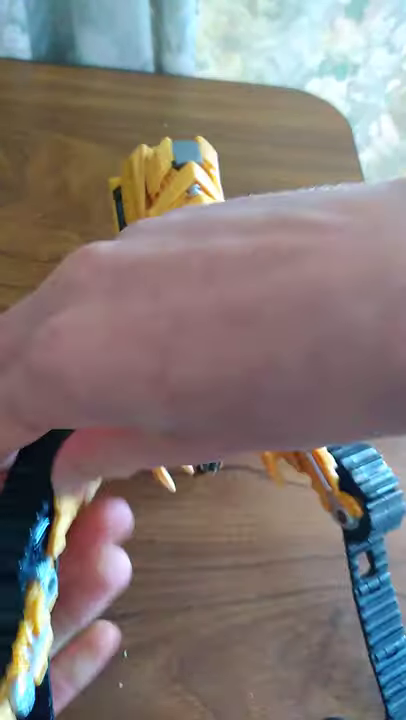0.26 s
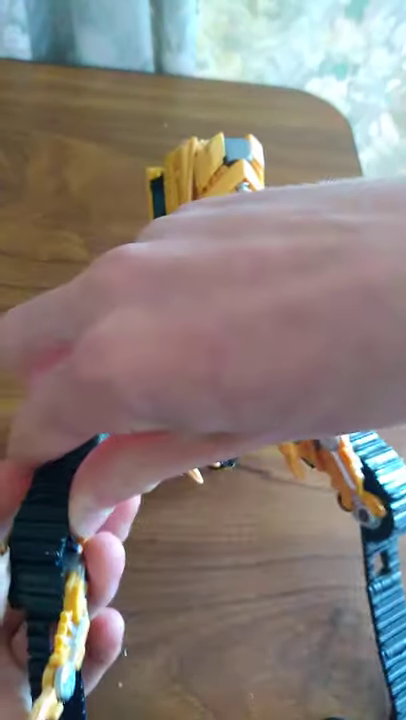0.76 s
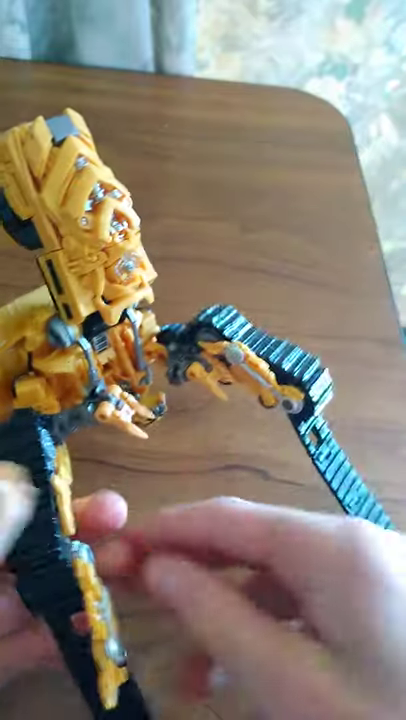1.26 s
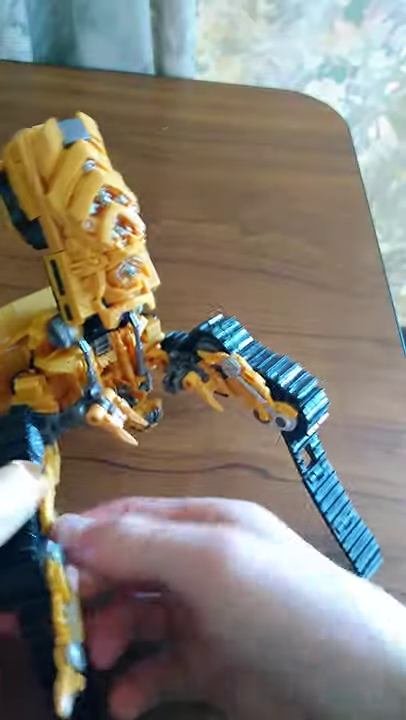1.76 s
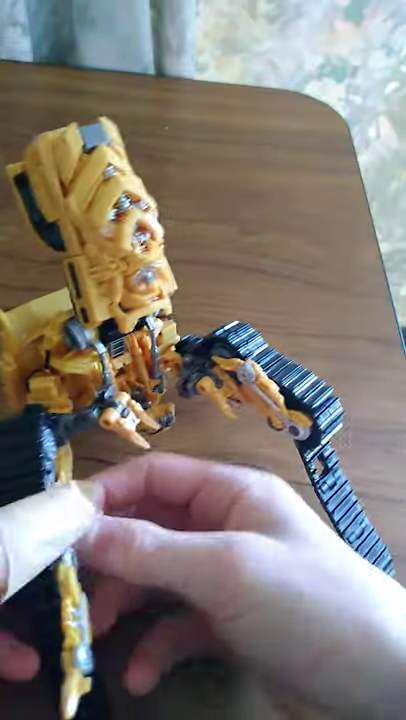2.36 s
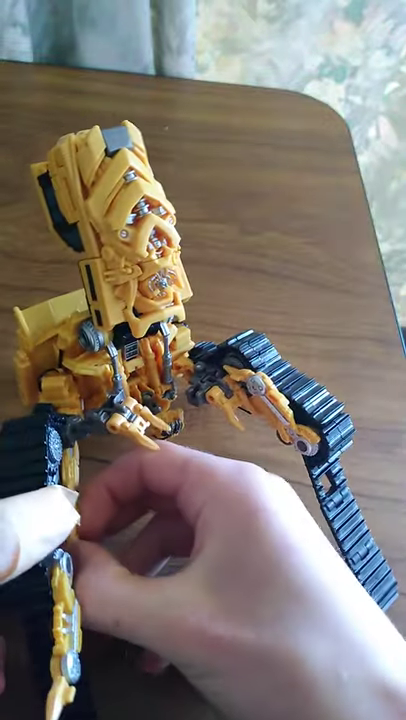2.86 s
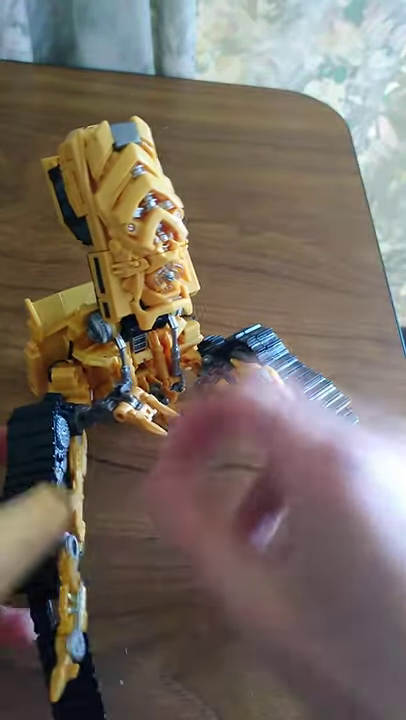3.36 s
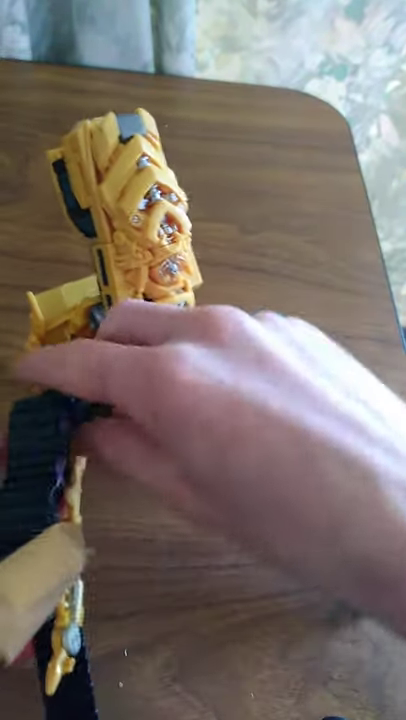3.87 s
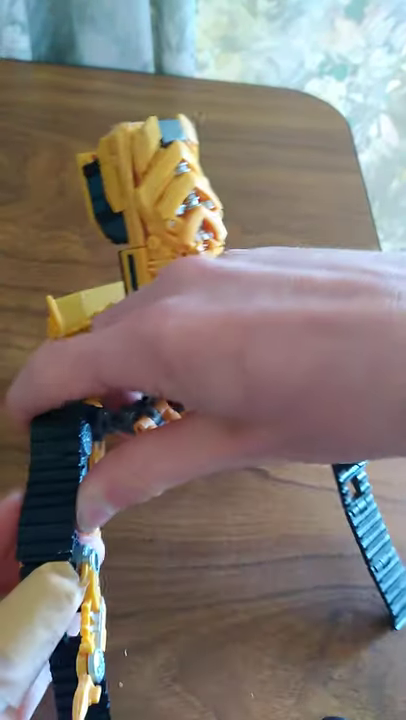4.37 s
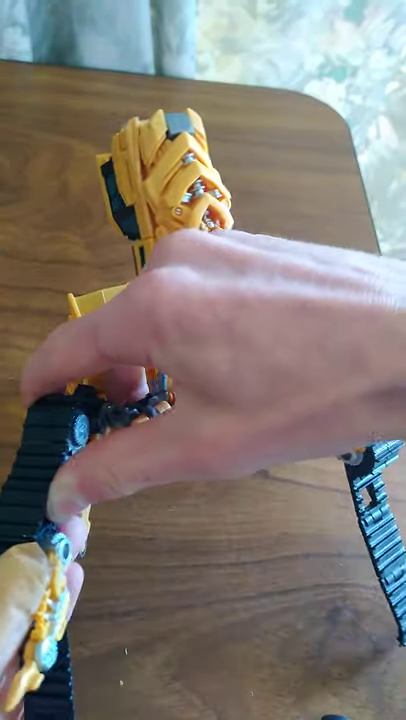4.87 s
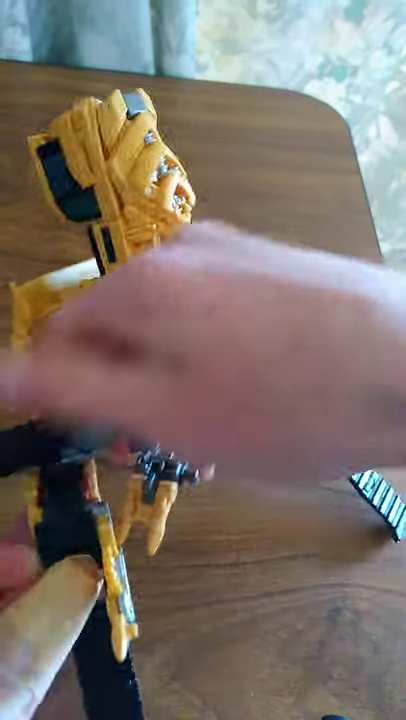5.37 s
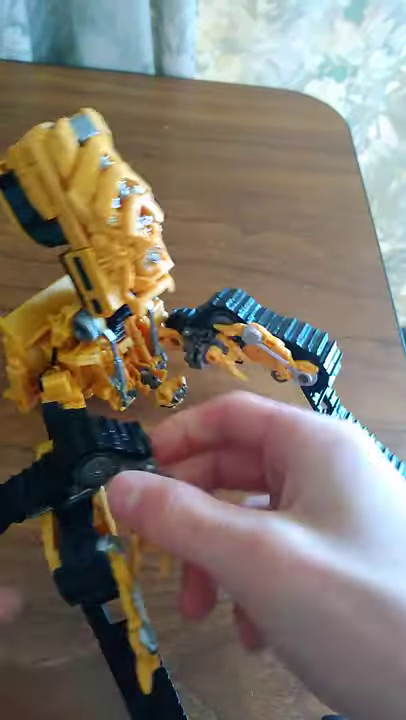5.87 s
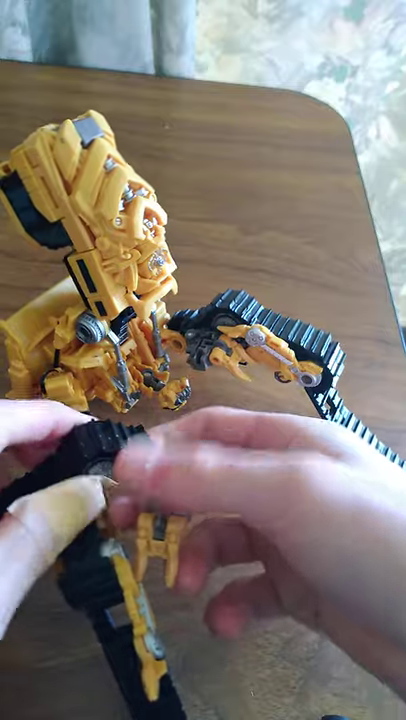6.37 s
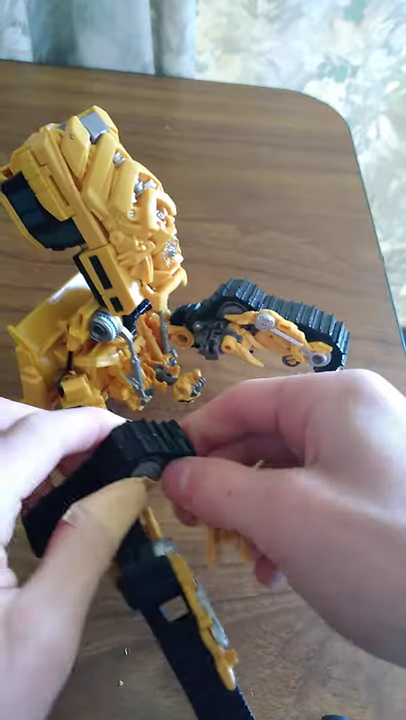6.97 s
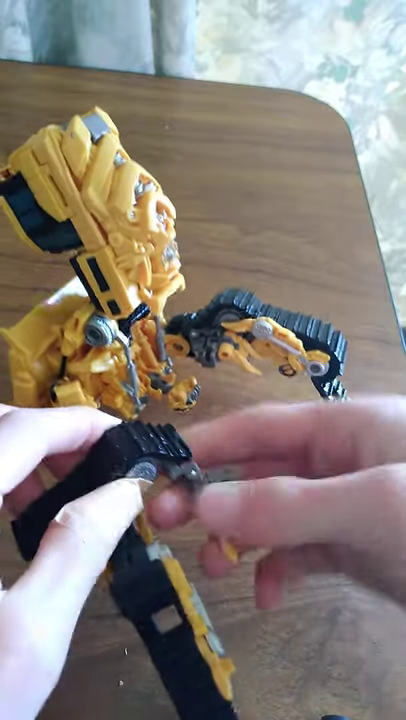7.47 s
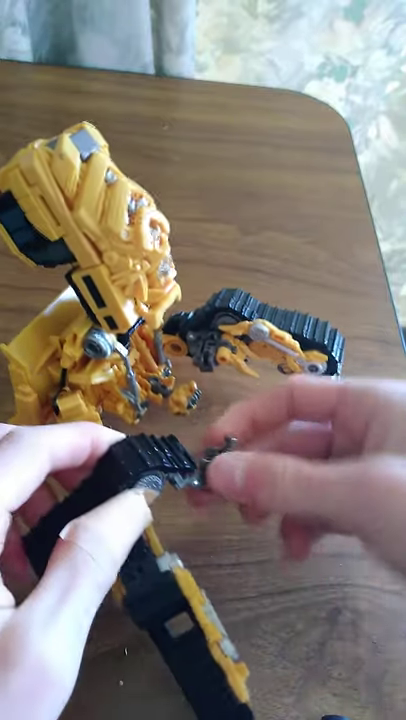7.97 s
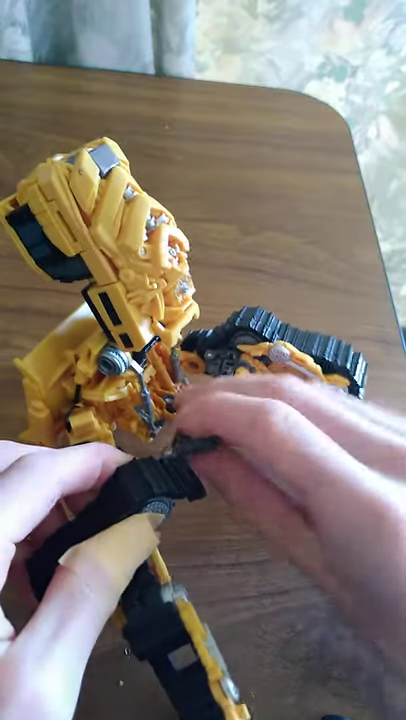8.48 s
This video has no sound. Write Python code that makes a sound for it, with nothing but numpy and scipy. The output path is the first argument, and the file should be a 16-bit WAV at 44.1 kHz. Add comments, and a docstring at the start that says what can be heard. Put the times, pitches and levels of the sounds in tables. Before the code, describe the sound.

Stiff plastic joints click and snap while fingers slide across the shell in short, airy, raspy strokes. Early handling is busy, including a scrape and two very bright ticks; the middle is mostly soft rubbing and muffled knocks. The strongest moment is a tight run of hard snaps and a table bump, followed by isolated clacks, faint hinge creaks and a double clack late on. Close microphones, small furnished room, low steady hiss.

```python
"""A plastic toy figure clicks, snaps and squeaks as two hands fold its limbs on a wooden table.
Clicks are short noise bursts and knocks are soft pushes; both ring the resonances of hollow plastic.
Rubbing, creaks, squeaks and one stiff joint's scrape are noise shaped by tiny stick-slip jerks.
Low table thuds, a small room and a faint steady hiss complete the close stereo sound."""
import sys
import numpy as np
from scipy import signal
from scipy.fft import rfft, irfft, next_fast_len
from scipy.io import wavfile

SR = 44100
rng = np.random.default_rng(int(sys.argv[2]) if len(sys.argv) > 2 else 0)


def persist_wave(psi):
    """Save psi, clipped to +-1, as 16-bit WAV."""
    counts = np.round(np.clip(psi, -1, 1) * 32767).astype(np.int16)
    wavfile.write(sys.argv[1], SR, np.atleast_2d(counts).T)


N = 384111  # samples in the scene
TAPS = 8192  # samples in the frequency grid and in the longest short sounds
HZ = np.fft.rfftfreq(TAPS, 1 / SR)
CUTOFF_HZ = 16200

# Finger or part sliding over plastic: [start t/s, length t/s, hollow level/dB, rasp level/dB, hiss level/dB]
STROKES = [(0, 0.13, -50, -49.5, -43.5), (0.151, 0.42, -67, -63.5, -48), (0.271, 0.25, -56.5, -52.5, -55),
           (0.617, 0.24, -94, -75, -76.5), (0.929, 0.2, -51.5, -49, -42.5), (1.127, 0.149, -48, -60, -51),
           (1.297, 0.106, -50, -50.5, -54.5), (1.386, 0.18, -65, -61.5, -45),
           (1.539, 0.15, -51.5, -51.5, -43.5), (1.776, 0.21, -57, -55, -50), (2.303, 0.26, -58, -67, -58),
           (2.693, 0.11, -66, -60.5, -48.5), (2.798, 0.17, -71, -72, -90),
           (3.24, 0.093, -66.5, -68.5, -49.5), (3.283, 0.5, -55, -73.5, -59.5),
           (3.507, 0.095, -57.5, -50, -51), (3.619, 0.19, -51.5, -48, -49),
           (3.821, 0.062, -51.5, -50, -43.5), (4.008, 0.23, -59, -59.5, -48.5),
           (4.13, 0.11, -79, -58, -49.5), (4.222, 0.21, -80, -61.5, -52), (4.504, 0.068, -53.5, -55.5, -49),
           (4.583, 0.18, -59, -66, -55), (5.063, 0.061, -51, -54, -61.5), (5.326, 0.45, -67.5, -72, -55),
           (5.791, 0.18, -53.5, -59.5, -50.5), (5.99, 0.44, -62.5, -63, -56), (6.11, 0.11, -55.5, -56, -45),
           (6.776, 0.17, -57.5, -63, -61.5), (6.927, 0.35, -71, -74.5, -86), (7.958, 0.1, -61, -69.5, -56),
           (8.046, 0.071, -56.5, -49.5, -44.5), (8.334, 0.22, -61, -71.5, -57),
           (8.377, 0.12, -55, -50.5, -45.5)]
# Constant faint rubbing of the holding hand: [hollow level/dB, rasp level/dB, hiss level/dB]
GRIP_LEVELS = (-88, -84, -71)
# Resonances brought out by a sliding finger: [f/Hz, width f/Hz, relative level/dB]
RUB_MODES = [(311, 26, 8), (508, 69, -4.5), (1100, 190, 0), (1505, 350, -5.5), (1990, 300, -6),
             (3190, 650, -7), (7300, 1400, -8), (9400, 810, 6), (11200, 4400, -20.5)]
# Treble shape of rubbing: [f/Hz, relative level/dB]
RUB_TREBLE = [(10000, 1.5), (12000, -4.5), (16000, -13)]
# Hollow, middle and bright registers of rubbed plastic: [from f/Hz, to f/Hz]
RUB_BANDS = [(190, 680), (900, 5200), (5500, 16500)]
# Resonance of a held part, favoured on the left: [f/Hz, width f/Hz, relative level/dB]
FACING_MODE = [(1100, 260, -6.5)]
STROKE_ATTACK_SHARE, STROKE_RELEASE_S = 0.14, 0.019  # share of the stroke's length; fade time
ARCH_DB = 7.5  # a stroke, creak or squeak is this much weaker at its ends than midway
PRESSURE_DB, PRESSURE_PER_S = 3, 63  # depth and rate of uneven finger pressure
RUB_PAN_DB = 0

# Quiet background colour: [f/Hz, relative level/dB]
BACKGROUND = [(30, 4.5), (80, 20), (180, 2), (320, -10.5), (700, -20.5), (1100, 1), (2500, -24.5),
              (5000, -29.5), (9300, -18.5), (13000, -18)]
BACKGROUND_DB = -69

# Toy bumping the table: [t/s, level/dB]
THUDS = [(.005, -47), (0.407, -44.5), (0.96, -45), (1.502, -47.5), (2.199, -42), (2.378, -45), (3.528, -49),
         (3.732, -43.5), (5.129, -39.5), (5.258, -27), (7.445, -34), (7.483, -38.5), (8.071, -45),
         (8.169, -54.5), (8.678, -53)]
# Low resonances of the table top: [f/Hz, width f/Hz, relative level/dB]
TABLE_MODES = [(68, 45, 0.5), (91, 6.1, 4), (118, 9.3, 3), (297, 39, -5), (336, 35, -5.5)]

# Joints snapping and parts clacking:
# [t/s, hollow knock level/dB, struck part f/Hz, crack level/dB, bright tick level/dB, contact t/s]
SNAPS = [(0.4026, -31, 1510, -26, -27, 0.0044), (0.8654, -34, 1060, -33, -26.5, 0.0037),
         (1.1466, -30.5, 1160, -38, -37, 0.0097), (1.382, -41, 940, -52, -42.5, 0.01),
         (1.827, -43.5, 1410, -44.5, -47, 0.0047), (2.0321, -35, 2760, -32.5, -13, 0.0031),
         (2.1969, -32.5, 1600, -26.5, -19.5, 0.0043), (2.2806, -37.5, 1280, -27, -8.5, 0.0037),
         (2.579, -44, 314, -47, -50, 0.011), (2.787, -39, 312, -45, -59, 0.0064),
         (3.586, -44.5, 1116, -45, -53.5, 0.0036), (3.743, -43.5, 1114, -41, -43, 0.0066),
         (5.114, -25, 2160, -29.5, -21.5, 0.003), (5.118, -35, 2160, -14.5, -11, 0.00097),
         (5.1229, -19.5, 1090, -25, -16, 0.0037), (5.1432, -27, 1560, -18.5, -11, 0.007),
         (5.1584, -27, 1910, -19, -13.5, 0.012), (5.231, -29.5, 1980, -30, -26, 0.0027),
         (5.2553, -17, 1330, -24, -15, 0.0018), (5.2761, -32.5, 1110, -29, -29, 0.013),
         (5.341, -34, 1920, -36.5, -28, 0.0059), (5.607, -30, 1450, -44, -46, 0.006),
         (5.63, -43.5, 520, -39, -45, 0.0033), (5.918, -32.5, 2030, -34.5, -28, 0.0017),
         (6.469, -37.5, 1180, -43.5, -44.5, 0.0049), (6.6123, -35.5, 1710, -34.5, -25, 0.00057),
         (6.7904, -32.5, 2005, -35.5, -37.5, 0.003), (7.4351, -23, 2050, -33, -21.5, 0.008),
         (7.4425, -23.5, 2050, -25, -24.5, 0.0025), (7.479, -30, 1890, -33.5, -29, 0.0051),
         (7.6046, -32, 1573, -38.5, -41.5, 0.0027), (8.087, -39.5, 1133, -50, -52, 0.012),
         (8.202, -40.5, 1400, -45.5, -46.5, 0.0078), (8.5388, -49.5, 2970, -41.5, -35, 0.0031),
         (8.612, -40, 980, -58, -57, 0.0014)]
# Small catches: [t/s, bright tick level/dB, contact t/s, left minus right level/dB before the microphones]
TICKS = [(0.016, -32.5, 0.00099, 3), (.188, -44.5, 0.0004, -9), (.234, -44, 0.0021, 13),
         (0.2845, -42, 0.0022, 13), (0.362, -30.5, 0.011, 2.5), (1.127, -34.5, 0.0022, 1),
         (2.052, -30.5, 0.0084, -7), (2.376, -37, 0.0013, 4), (2.598, -26, 0.0154, 0.5),
         (3.525, -39, 0.01, 1), (4.188, -41.5, 0.0021, 9), (4.721, -36, 0.0025, -8.5),
         (5.089, -42.5, 0.0015, 5.5), (6.301, -35, 0.0031, 1), (7.411, -44, 0.0019, 8),
         (7.462, -28, 0.00112, 0)]
# Resonances of the plastic shell: [f/Hz, width f/Hz, relative level/dB]
SHELL_MODES = [(303, 60, 1.5), (370, 440, -11.5), (526, 60, -2), (1020, 230, 0), (1600, 69, -3.5),
               (1760, 170, -6), (2142, 240, -6.5), (3226, 580, -6), (5170, 3400, -9.5), (7700, 1700, -7.5),
               (9324, 1200, 4.5), (11200, 4400, -20)]
# Treble shape of a click: [f/Hz, relative level/dB]
CLICK_TREBLE = [(10000, 4.5), (16000, 2.5)]
# Hollow, middle and bright registers of struck plastic: [from f/Hz, to f/Hz]
CLICK_BANDS = [(180, 2450), (2450, 6500), (6500, 16500)]
TICK_KNOCK_DB, TICK_CRACK_DB, TICK_PART_HZ = -26.5, -15, 1690  # both levels are against the tick
CHATTER_DB, CHATTER_S = -28.5, 0.021  # level against the contact; decay time
# Gain at the very top for each halving of contact time, counted from the plain contact
SHARP_DB, PLAIN_CONTACT_S = 1.5, 0.01

# Soft knocks on hollow parts: [t/s, level/dB, struck part f/Hz]
KNOCKS = [(0.094, -45.5, 960), (.405, -41.5, 320), (1.163, -35.5, 424), (1.216, -44.5, 380),
          (1.235, -45, 450), (1.311, -52.5, 1090), (1.341, -44.5, 890), (1.498, -48, 570),
          (2.198, -39.5, 340), (2.355, -42.5, 1190), (2.378, -41.5, 960), (2.498, -43, 340),
          (2.518, -42.5, 340), (2.939, -53, 1170), (3.398, -59.5, 350), (3.44, -54, 350),
          (4.071, -43.5, 340), (4.092, -45.5, 393), (5.774, -47, 980), (7.979, -55.5, 1140),
          (8.066, -45, 1120), (8.167, -57, 535), (8.679, -51.5, 1090)]
# Resonances that soft knocks ring: [f/Hz, width f/Hz, relative level/dB]
KNOCK_MODES = [(333.4, 8.9, 4), (555, 50, -5.5), (1023, 220, -9), (1460, 180, -9.5)]
KNOCK_TOP_HZ, KNOCK_CONTACT_S = 1550, 0.0052  # the steep treble fall; decay time of the padded push

# Dry hinge giving a little: [start t/s, length t/s, level/dB]
CREAKS = [(0.706, 0.011, -55), (1.087, 0.0086, -39.5), (5.495, 0.074, -54.5), (5.728, 0.07, -52),
          (6.82, 0.075, -52.5), (6.884, 0.028, -42.5), (6.424, 0.045, -60), (6.665, 0.056, -52),
          (7.057, 0.022, -58.5), (7.158, 0.028, -54.5), (7.203, 0.037, -45), (7.356, 0.04, -47),
          (7.404, 0.023, -50), (8.407, 0.097, -48)]
# Resonances of the hinge: [f/Hz, width f/Hz, relative level/dB]
HINGE_MODES = [(990, 80, 8.5), (1600, 82, 4.5), (1990, 270, 2.5), (3160, 450, -8.5), (4130, 360, -20.5)]
CREAK_ATTACK_S, CREAK_RELEASE_S = 0.0067, 0.0049

# Resonances of the stiff joint: [f/Hz, width f/Hz, relative level/dB]
JOINT_MODES = [(333, 41, -3.5), (1108, 130, 4.5), (1520, 230, -0.5), (1740, 250, -10.5),
               (3880, 7100, -15.5), (9630, 720, -5)]
SCRAPE_START_S, SCRAPE_LENGTH_S, SCRAPE_DB = 0.8365, 0.16, -25
SCRAPE_ATTACK_S, SCRAPE_ARCH_DB, SCRAPE_RELEASE_S = 0.057, 10.5, 0.003

# Tight parts squeaking together: [start t/s, length t/s, level/dB, f/Hz]
SQUEAKS = [(1.368, 0.038, -44, 3250), (1.573, 0.029, -44.5, 3180), (4.347, 0.037, -57.5, 1990)]
SQUEAK_WIDTH_HZ, SQUEAK_OVERTONE, SQUEAK_OVERTONE_DB = 160, 1.55, -11.5  # overtone as a frequency ratio

# Time for room sound to fall by 60 dB: [f/Hz, t/s]
ROOM_T60 = [(300, 0.37), (1000, 0.21), (3000, 0.28), (12000, 0.24)]
# Room sound against direct sound: [f/Hz, level/dB]
ROOM_LEVEL = [(250, -3), (1000, -6), (3000, -7.5), (9000, -8)]
# Likeness of the two microphones: [f/Hz, likeness 0-1]
LIKENESS = [(120, .96), (400, .85), (800, .45), (1500, .1)]
# Left microphone minus right: [f/Hz, level/dB]
BALANCE = [(150, 0), (300, 2), (600, -1), (1100, 5), (2000, 1.5), (4000, -.5), (9000, .5)]
GRIP_SHIFT = 0.1  # largest share by which a change of grip retunes low resonances


def amp(db):
    """Turns decibels into gain."""
    return 10 ** (np.asarray(db) / 20)


def unit(x):
    """Scales to an average strength (rms) of 1."""
    return x / np.sqrt(np.mean(x ** 2) + 1e-20)


def read(points, hz):
    """Reads between table points on a log-frequency axis."""
    f, value = np.transpose(points)
    return np.interp(np.log(hz + 1), np.log(f + 1), value)


def add(mix, s, sound):
    """Mixes a sound in at time s, cutting it off at the end of the scene."""
    part = mix[:, max(round(s * SR), 0):][:, :sound.shape[1]]
    part += sound[:, :part.shape[1]]


def pan(db):
    """Left and right gains whose difference is db."""
    return amp(np.array([[db], [-db]]) / 2)


def causal(gain):
    """Builds an impulse response with this gain that rings only after the blow (minimum phase)."""
    mirrored = np.r_[gain, gain[-2:0:-1]]
    log_gain = np.log(np.maximum(mirrored, 1e-5))
    spectrum = np.exp(np.conj(signal.hilbert(log_gain)))
    return np.fft.ifft(spectrum).real[:TAPS // 2]


def ring(x, response):
    """Lets each channel ring through an impulse response."""
    convolve = signal.oaconvolve if x.shape[1] > SR else signal.fftconvolve
    return convolve(x, np.atleast_2d(response), axes=1)[:, :x.shape[1]]


def body(modes, skirt=1.04):
    """Adds the power of resonances; a larger skirt makes their sides fall faster."""
    power = 0
    for f, width, db in modes:
        detune = (HZ ** 2 - f * f) / (HZ * width + 1)
        power = power + amp(db) ** 2 / (1 + detune ** 2) ** skirt
    return np.sqrt(power)


def registers(modes, treble, bands, skirt=1.5):
    """Splits the plastic's resonances into hollow, middle and bright registers."""
    gain = body(modes, skirt) * amp(read(treble, HZ))
    return [gain / np.sqrt((1 + (lo / (HZ + 1)) ** 12) * (1 + (HZ / hi) ** 16)) for lo, hi in bands]


def spot(depth_db):
    """Each point of contact favours its own chance set of small resonances."""
    ripple = np.convolve(rng.standard_normal(len(HZ)), np.hanning(40), "same")
    return amp(depth_db * unit(ripple))


def regrip(gain, amount):
    """A tighter or looser grip (amount -1 to 1) moves the low resonances up or down."""
    shift = GRIP_SHIFT * amount / (1 + (HZ / 4000) ** 2)
    return np.interp(HZ * (1 - shift), HZ, gain)


def wander(drive, gain, spot_db=6.5, count=3):
    """Contact slides through a cycle of spots, about ten a second, so the colour keeps changing."""
    speed = np.repeat(rng.uniform(.5, 1.5, N // TAPS + 1), TAPS)[:drive.shape[1]]
    place = np.cumsum(speed) * 10 / SR
    out = np.zeros(drive.shape)
    for k in range(count):
        share = np.sin(np.pi / 2 * np.minimum((place - k) % count, 2))
        grip = 2 * k / (count - 1) - 1
        out += share * unit(ring(drive, causal(regrip(gain, grip) * spot(spot_db))))
    return out


def slips(per_s, spread_db, smooth):
    """Tiny stick-slip jerks of uneven size swell noise above a smooth friction hiss."""
    happens = rng.random(N) < per_s / SR
    sizes = amp(spread_db * np.minimum(rng.exponential(1, N), 3)) * happens
    # The power of each jerk dies away over 6.5 ms
    power = signal.lfilter([1], [1, -np.exp(-1 / (0.0065 * SR))], sizes ** 2)
    strength = np.sqrt(power / power.mean() + smooth ** 2)
    return unit(strength * rng.standard_normal((2, N)))


def push(start, length, attack_s, arch_db, release_s):
    """Strength of one push of the hand: it takes hold, peaks and dies away."""
    t = np.arange(0, length + 8 * release_s, 1 / SR)
    attack = np.sin(np.pi / 2 * np.minimum(t / attack_s, 1)) ** 2
    arch = amp(-arch_db * (2 * np.minimum(t / length, 1) - 1) ** 2)
    release = np.exp(-np.maximum(t - length, 0) / release_s)
    out = np.zeros((1, N))
    add(out, start, (attack * arch * release)[None])
    return out[0]


def blow(sound):
    """Scales each channel of a hit so that its energy, spread over 10 ms, has rms 1."""
    return sound * np.sqrt(.01 * SR) / np.linalg.norm(sound, axis=-1, keepdims=True)


def pressure():
    """Chance swells and dips in how hard a finger bears down."""
    steps = np.arange(N) * PRESSURE_PER_S / SR
    levels = np.clip(rng.standard_normal(TAPS), -2, 2)
    return unit(amp(PRESSURE_DB * np.interp(steps, np.arange(TAPS), levels)))


def rubbing():
    """Slow, coarse slips sound the hollow body; fine quick ones rasp and hiss."""
    power = amp(GRIP_LEVELS)[:, None] ** 2 * np.ones(N)
    for start, length, *levels in STROKES:
        stroke = push(start, length, STROKE_ATTACK_SHARE * length, ARCH_DB, STROKE_RELEASE_S)
        power += amp(levels)[:, None] ** 2 * stroke ** 2
    coarse, fine = slips(130, 1.5, 0.22), slips(220, 8.2, 0.78)
    drives = coarse * pressure(), fine * pressure(), fine
    gains = registers(RUB_MODES, RUB_TREBLE, RUB_BANDS, 1.154)
    layers = zip(np.sqrt(power), drives, gains)
    return pan(RUB_PAN_DB) * sum(strength * wander(drive, gain) for strength, drive, gain in layers)


def facing(x):
    """One resonance of the held part is raised on the left and lowered on the right."""
    gain = 1 + body(FACING_MODE)
    return ring(x, np.array([causal(gain), causal(1 / gain)]))


def background():
    """Faint steady room noise and hiss: random noise coloured by frequency."""
    colour = causal(amp(read(BACKGROUND, HZ)))
    return amp(BACKGROUND_DB) * unit(ring(rng.standard_normal((2, N)), colour))


def thuds():
    """The toy settles on the table top, whose low modes ring from a dying noise push."""
    out, t = np.zeros((2, N)), np.arange(TAPS) / SR
    wood = causal(body(TABLE_MODES) / (1 + (HZ / 600) ** 4) / (1 + (52 / (HZ + 1)) ** 6))
    wood *= np.cos(np.linspace(0, np.pi / 2, len(wood)))  # the hands damp the ring
    settling = np.exp(-t / .018)
    for s, db in THUDS:
        force = settling * rng.standard_normal((2, TAPS))
        sound = signal.fftconvolve(force, wood[None], axes=1)
        # The level is set over the first thirtieth of a second
        add(out, s, amp(db) * sound / sound[:, :SR // 30].std(axis=1, keepdims=True))
    return out


def contacts():
    """Lists snaps and ticks alike; ticks barely stir the lower registers of the body."""
    ticks = [(s, db + TICK_KNOCK_DB, TICK_PART_HZ, db + TICK_CRACK_DB, db, length, side_db)
             for s, db, length, side_db in TICKS]
    return [(*row, 0) for row in SNAPS] + ticks


def clicks(part_db=5, part_width_hz=340, spot_db=2.5):
    """A brief hard burst, then the chatter of loose parts, rings the struck part and the body."""
    out, t = np.zeros((2, N)), np.arange(TAPS // 2) / SR
    gains = registers(SHELL_MODES, CLICK_TREBLE, CLICK_BANDS)
    top = np.clip((HZ - 9500) / 4500, 0, 1)
    for s, knock_db, hz, crack_db, tick_db, length, side_db in contacts():
        rattle = np.repeat(rng.exponential(1, len(t) // 64), 64)
        chatter = amp(CHATTER_DB) * rattle * np.exp(-t / CHATTER_S)
        contact = np.exp(-(t / max(length, .0005)) ** 2)
        burst = (contact + chatter) * rng.standard_normal((2, len(t)))
        grip = rng.uniform(-1, 1)
        part = spot(spot_db) * (0.5 + body([(hz, part_width_hz, part_db)]))
        part *= amp(SHARP_DB * np.log2(PLAIN_CONTACT_S / length) * top)  # short contacts are sharper
        for db, gain in zip((knock_db, crack_db, tick_db), gains):
            sound = ring(burst, causal(regrip(gain, grip) * part))
            add(out, s, amp(db) * pan(side_db) * blow(sound))
    return out


def knocks(part_db=4, part_width_hz=320, spot_db=2, side_db=4):
    """A part cushioned by the fingers lands in a soft, uneven push, and the hollow modes ring on."""
    out, gain = np.zeros((2, N)), body(KNOCK_MODES) / (1 + (HZ / KNOCK_TOP_HZ) ** 10)
    age = np.arange(TAPS // 2) / SR / KNOCK_CONTACT_S
    for s, db, hz in KNOCKS:
        force = np.sqrt(age) * np.exp(-age) * rng.standard_normal((1, len(age)))
        part = spot(spot_db) * (0.5 + body([(hz, part_width_hz, part_db)]))
        sound = ring(force, causal(gain * part))
        add(out, s, amp(db) * pan(side_db) * blow(sound))
    return out


def creaks(spot_db=4):
    """Quick slips in a dry hinge ring its few resonances."""
    strength = sum(amp(db) * push(s, length, CREAK_ATTACK_S, ARCH_DB, CREAK_RELEASE_S)
                   for s, length, db in CREAKS)
    return strength * wander(slips(400, 1.4, 0.6), body(HINGE_MODES, 1.72), spot_db)


def scrape(spot_db=2):
    """A tight joint turns once, juddering round in a dense run of slips."""
    turn = push(SCRAPE_START_S, SCRAPE_LENGTH_S, SCRAPE_ATTACK_S, SCRAPE_ARCH_DB, SCRAPE_RELEASE_S)
    judder = slips(520, 2.5, .55)
    gain = body(JOINT_MODES) * amp(read(RUB_TREBLE, HZ))
    return amp(SCRAPE_DB) * turn * wander(judder, gain, spot_db)


def squeaks():
    """Plastic binds on plastic: quick slips sing in one narrow resonance and its overtone."""
    out, drive = np.zeros((2, N)), slips(450, 2.1, 0.69)
    for s, length, db, hz in SQUEAKS:
        span = slice(round(s * SR), round(s * SR) + TAPS)
        strength = push(s, length, CREAK_ATTACK_S, ARCH_DB, CREAK_RELEASE_S)[span]
        overtone = (hz * SQUEAK_OVERTONE, SQUEAK_WIDTH_HZ, SQUEAK_OVERTONE_DB)
        part = causal(body([(hz, SQUEAK_WIDTH_HZ, 0), overtone], 1.5))
        add(out, s, amp(db) * strength * unit(ring(drive[:, span], part)))
    return out


def room(first_s=0.0035):
    """Dense reflections of random sign, each frequency dying away at its own rate."""
    size = SR * 2 // 3
    taps = rng.choice([-1., 1.], (2, size)) * (rng.random((2, size)) < 5000 / SR)
    taps[:, :round(first_s * SR)] = 0
    hz, t, z = signal.stft(unit(taps), SR, nperseg=256)
    t60 = read(ROOM_T60, hz)[:, None]
    fade = amp(read(ROOM_LEVEL, hz)[:, None] - 60 * t / t60)
    z *= fade * np.sqrt(2 * np.log(1000) / (t60 * SR))  # evens out the energy of long and short fades
    return signal.istft(z, SR, nperseg=256)[1]


def microphones(x):
    """Long waves reach both microphones nearly alike, short ones differently."""
    size = next_fast_len(N + TAPS)
    hz, (a, b) = np.fft.rfftfreq(size, 1 / SR), rfft(x, size)
    same, side = np.clip(read(LIKENESS, hz), 0, 1), amp(read(BALANCE, hz) / 2)
    left = a * side
    right = (same * a + np.sqrt(1 - same ** 2) * b) / side
    even_power = np.sqrt(2 / (side ** 2 + side ** -2))
    return irfft(np.array([left, right]) * even_power, size)[:, :N]


def scene():
    """The toy, the table and their room."""
    direct = facing(rubbing() + creaks()) + thuds() + clicks() + knocks() + scrape() + squeaks()
    return microphones(direct + ring(direct, room()) + background())


def record(dry):
    """Strong peaks overload softly; then a filter removes the highest treble."""
    limited = dry / (1 + dry ** 4) ** .25
    lowpass = signal.firwin(401, CUTOFF_HZ, window=("kaiser", 8), fs=SR)
    return signal.oaconvolve(limited, lowpass[None], "same", axes=1)


dry = scene()
out = record(dry)
persist_wave(out)
```